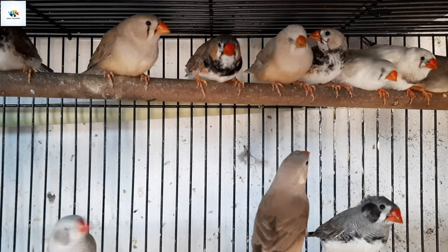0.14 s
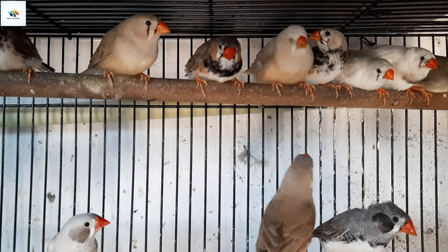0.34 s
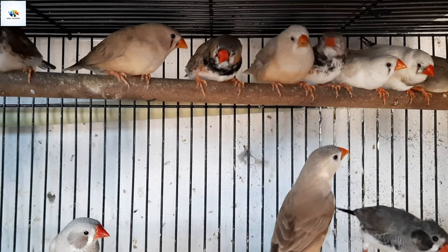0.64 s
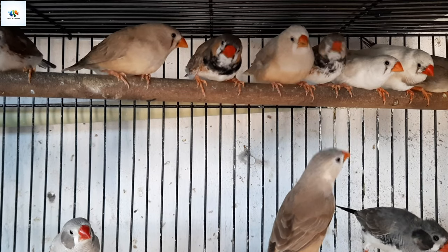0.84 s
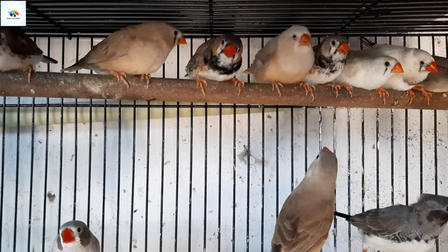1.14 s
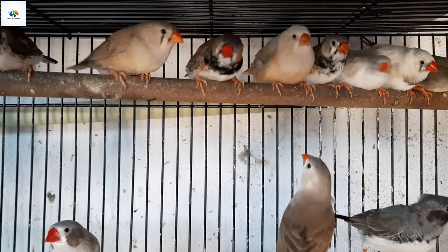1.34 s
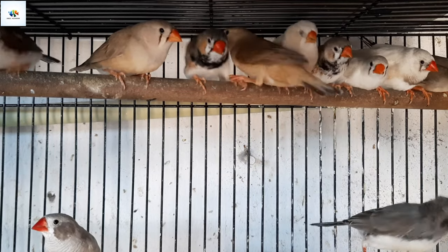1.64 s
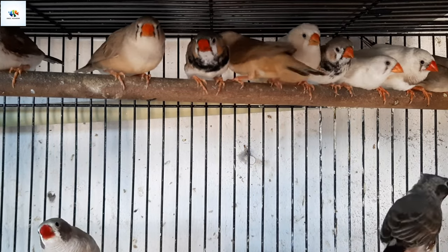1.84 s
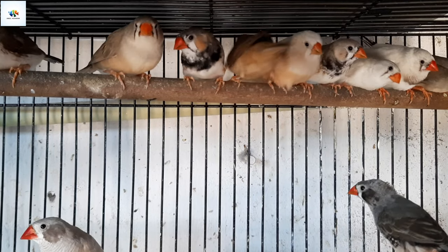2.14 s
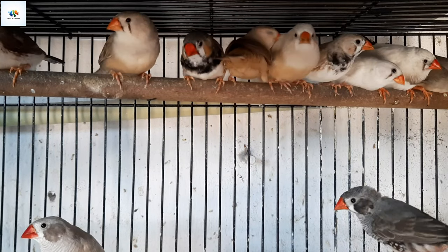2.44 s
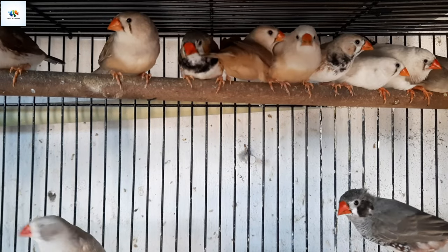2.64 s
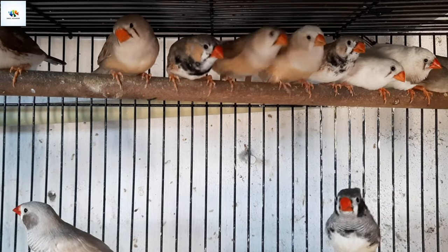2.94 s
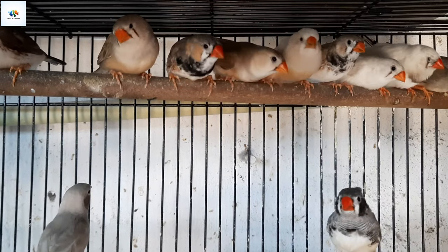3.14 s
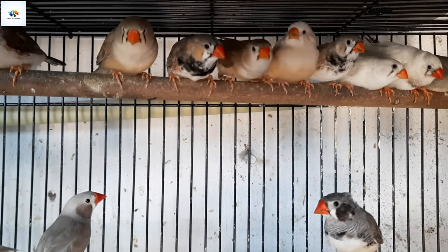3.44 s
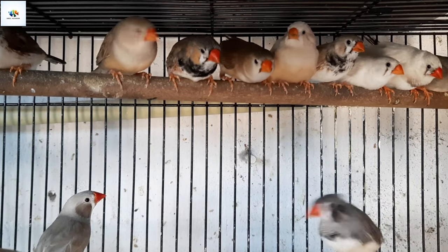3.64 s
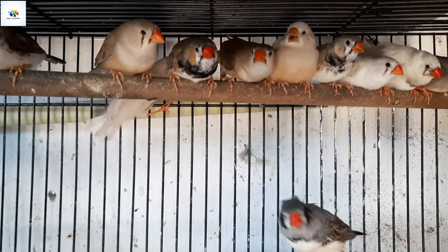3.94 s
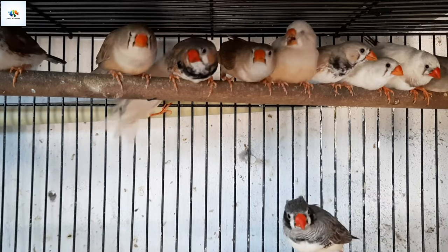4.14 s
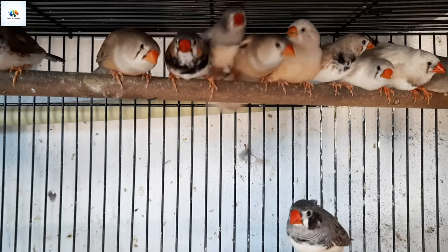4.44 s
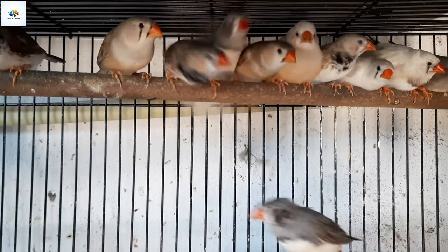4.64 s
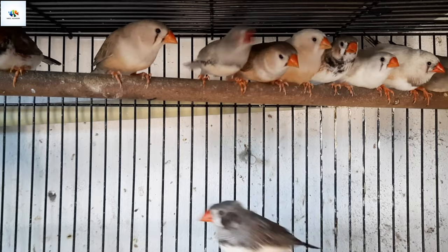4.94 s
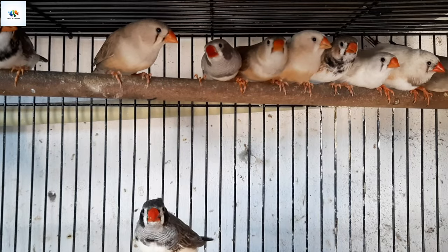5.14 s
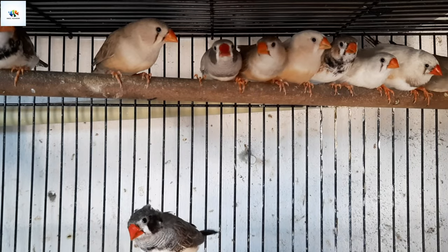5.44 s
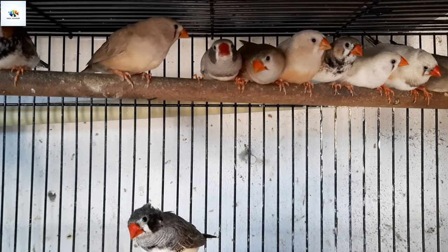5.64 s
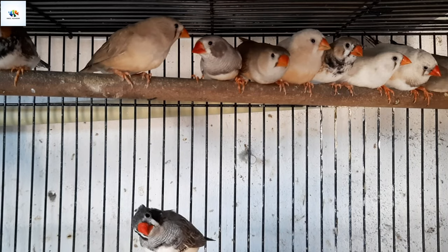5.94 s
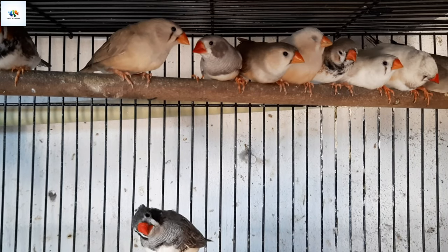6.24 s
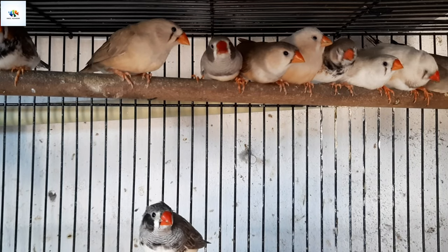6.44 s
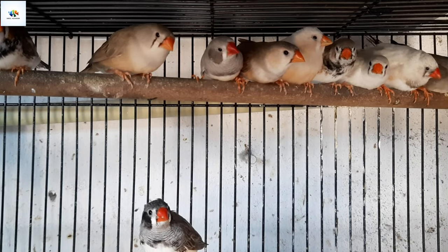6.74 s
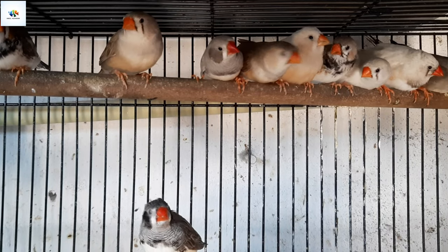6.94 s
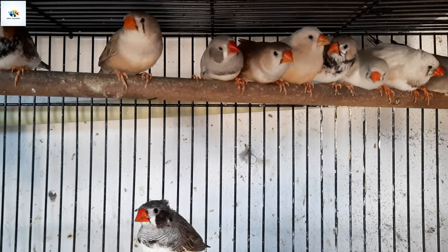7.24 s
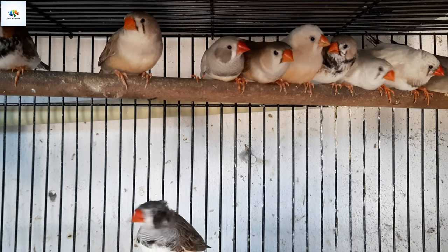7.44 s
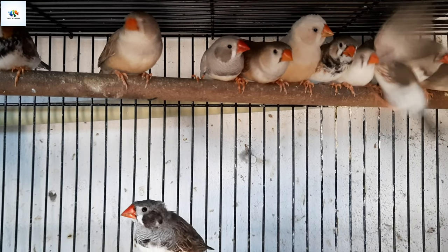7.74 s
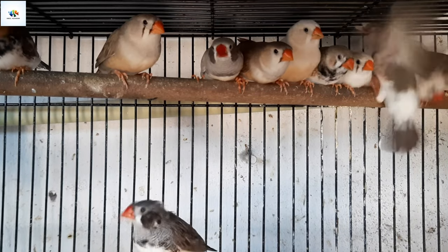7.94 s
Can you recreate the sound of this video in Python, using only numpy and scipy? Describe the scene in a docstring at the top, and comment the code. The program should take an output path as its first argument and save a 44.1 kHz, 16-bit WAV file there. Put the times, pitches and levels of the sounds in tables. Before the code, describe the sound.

Caged finches chatter indoors with raspy, hoarse calls, short peeps and bending whistles, over faint hiss and low room rumble, heard mostly on the right.

```python
"""Room rumble, hiss and soft flock chatter open the scene; clipped notes, peeps and hoarse calls soon join.
Zebra finches crowd a perch in an indoor cage: whistles bend, flutter and roughen, and hoarse calls are
pulses and air through a throat resonance. Taps on the wire, wing beats and low puffs are shaped noise.
The hiss dies away late on. Nearly all is on the right; the left has rumble and a dull trace of the birds.
"""
import sys
import numpy as np
from scipy import signal
from scipy.fft import rfft, irfft, next_fast_len
from scipy.io import wavfile
from scipy.ndimage import uniform_filter1d

SR = 44100
rng = np.random.default_rng(int(sys.argv[2]) if len(sys.argv) > 2 else 0)


def wrap_up_sound(samples):
    """Save the sound to the file named by the first command line argument, as 16-bit audio."""
    columns = np.atleast_2d(samples).T
    # keep every value between -1 and 1, then stretch to whole-number steps
    tamed = np.clip(columns, -1, 1)
    steps = np.round(tamed * 32767).astype(np.int16)
    wavfile.write(sys.argv[1], SR, steps)


N = 356769

# All levels below are ahead of the mix gains in scene().
# Colour of the room's rumble: frequency_hz, gain_db
ROOM_COLOUR = [(20, -12.5), (45, -1.5), (115, 1), (200, -2), (330, -10.5), (490, -5), (700, -12),
               (4000, -17.5), (6500, -20), (9000, -38.5)]
# Level of the room's rumble: start_s, level_db
ROOM_LEVEL = [(0, -52), (.75, -58), (2.3, -47), (3.3, -47), (4.4, -51), (6.3, -55.5), (8.09, -52)]
# Colour of the hiss: frequency_hz, gain_db
HISS_COLOUR = [(300, -82), (1000, -20.5), (2200, -10), (4000, -4), (5300, 2.5), (6600, 3.5), (7900, -8),
               (10000, -11), (13000, -20.5)]
# Level of the flock's chatter: start_s, level_db
CHATTER_LEVEL = [(0, -63.5), (.3, -43), (.55, -59.5), (.97, -44.5), (1.22, -50.5), (1.6, -45), (3.7, -47),
                 (4.2, -50.5), (5.7, -52), (6, -60.5), (7.15, -57), (7.35, -62.5), (8.09, -53)]
# Tiny clipped contact notes: start_s, length_s, level_db
TET_NOTES = [(0.059, 0.016, -41.5), (0.163, .02, -37.5), (1.259, .018, -41.5), (2.704, 0.026, -36.5),
             (2.796, 0.048, -35), (2.877, 0.043, -34.5), (7.462, 0.014, -50.5), (7.545, .019, -53),
             (7.601, 0.014, -47), (7.674, 0.025, -46.5), (7.755, 0.017, -46)]
# Short rising peeps: start_s, length_s, level_db, pitch_hz
RISING_PEEPS = [(0.229, 0.053, -41.5, 2990), (0.334, 0.05, -37, 3010), (0.849, .04, -48.5, 998),
                (1, 0.054, -45.5, 2660), (1.177, 0.02, -42, 1920), (2.577, .03, -39.5, 2890),
                (2.623, 0.061, -38.5, 1680), (2.969, 0.043, -44, 2620), (3.059, 0.046, -42.5, 2664),
                (3.533, 0.04, -35.5, 2870), (4.207, 0.027, -40, 2480), (4.264, 0.038, -45.5, 2820),
                (4.316, 0.038, -44, 2600), (4.807, 0.023, -41, 2580), (6.617, 0.036, -49, 1246),
                (6.659, 0.059, -47, 1870), (7.196, .035, -49, 1750)]
# Hoarse calls: start_s, length_s, level_db, throat_hz
HOARSE_CALLS = [(0.245, 0.028, -28.5, 4460), (0.353, 0.049, -32, 4900), (0.574, 0.077, -26, 6400),
                (0.694, 0.083, -28, 4500), (0.754, 0.063, -30.5, 5900), (1.297, 0.025, -30.5, 3900),
                (1.577, 0.07, -31.5, 6030), (1.65, 0.19, -28.5, 6460), (1.783, 0.094, -24, 5540),
                (1.89, 0.1, -21.5, 6150), (1.957, 0.11, -26.5, 5270), (2.044, .11, -20, 6080),
                (2.147, 0.063, -33.5, 4870), (2.226, 0.13, -23.5, 6480), (2.451, 0.13, -21.5, 6260),
                (2.904, 0.096, -25, 6030), (3.051, 0.071, -27.5, 5940), (3.113, 0.13, -23.5, 6240),
                (3.238, 0.088, -24, 6600), (3.322, 0.088, -23, 5630), (3.384, 0.091, -22, 6160),
                (3.466, 0.066, -27.5, 6460), (3.66, 0.056, -30, 3600), (4.358, 0.054, -31, 6350),
                (4.527, 0.11, -30.5, 5460), (4.661, 0.038, -35.5, 4170), (4.867, 0.07, -30.5, 6140),
                (5.027, .12, -33.5, 5840), (5.142, 0.059, -33.5, 6400), (5.259, 0.053, -34.5, 5350),
                (5.622, 0.019, -32.5, 4400), (6.66, 0.034, -39, 3440), (6.734, 0.039, -41, 4040),
                (6.851, 0.028, -31, 5530)]
# Colour of a hoarse call beside its throat resonance: frequency_hz, gain_db
VOICE_COLOUR = [(700, -37), (1500, -17.5), (2200, -10.5), (3000, -2.5), (4200, 0), (7100, -0.5),
                (8200, -21.5), (9500, -17), (13000, -28.5)]
# Falling chirps: start_s, length_s, level_db, start_pitch_hz, end_pitch_hz
FALLING_CHIRPS = [(0.273, 0.053, -40.5, 3900, 2030), (0.573, 0.14, -47, 2620, 1544),
                  (1.476, .065, -47, 2140, 1590), (3.699, .08, -44, 2095, 1570),
                  (4.065, 0.064, -50.5, 1925, 1590), (4.419, 0.038, -55, 1960, 1100),
                  (4.768, 0.054, -46.5, 2840, 1920), (4.986, 0.18, -51, 1143, 964),
                  (5.87, 0.14, -55.5, 2090, 1720), (7.034, 0.046, -53.5, 2870, 1410),
                  (7.107, .055, -48, 2030, 1576), (7.254, 0.045, -52, 2100, 1830),
                  (7.525, 0.088, -57, 4200, 4130), (7.697, 0.066, -42.5, 1763, 1590),
                  (7.75, 0.082, -45.5, 2520, 1550), (7.984, 0.08, -51, 1780, 1583)]
# Long warbling calls, one list of turning points each: time_s, pitch_hz, level_db, roughness (held to 0-1)
WARBLE_CALLS = [
    [(0.466, 4600, -35.5, 0.35), (0.495, 3770, -45, 0.4), (0.513, 2770, -35.5, 0.3),
     (0.526, 3900, -36.5, 0.4), (0.55, 4150, -39.5, 0.65), (0.576, 2940, -32.5, 0.55)],
    [(2.155, 3920, -31, 0.42), (2.188, 3460, -29, 0.12), (2.208, 2526, -41, 0.17), (2.216, 3780, -31, 0.6),
     (2.23, 3280, -31, 0.17), (2.256, 2960, -35, 0.1)],
    [(2.332, 4200, -29, 0.2), (2.358, 2750, -44, 0), (2.378, 2290, -42, 0.15), (2.399, 4240, -36.5, 0.42),
     (2.425, 2490, -39, 0.5)],
    [(3.602, 3460, -37, 0.3), (3.612, 3785, -32.5, 0.17), (3.64, 3450, -29, 0.27), (3.66, 2710, -35, 0.6)],
    [(3.732, 2406, -36, 0.34), (3.758, 2838, -31, 0.42), (3.785, 3300, -42, 0.6),
     (3.792, 3234, -25.5, 0.32), (3.83, 3595, -34.5, 0.88), (3.868, 3220, -42.5, 1.2)],
    [(3.906, 4510, -37, 0.15), (3.914, 4550, -36, 0), (3.926, 3480, -46, 0.94), (3.968, 3290, -39.5, 0.92),
     (3.984, 2627, -30.5, 0.44), (4.015, 2930, -37, 0.55)],
    [(5.392, 5670, -53.5, 0.54), (5.425, 3400, -42.5, 0.48), (5.46, 2480, -38.5, 0.35),
     (5.49, 2810, -37, 0.14), (5.512, 2670, -51, 0.6)],
    [(5.605, 4900, -55, 0.8), (5.629, 3900, -45, 0.38), (5.634, 3946, -34.5, 0.64),
     (5.652, 3640, -31.5, 0.42), (5.668, 2885, -40.5, 0.7), (5.698, 3423, -28, 0.26),
     (5.716, 3290, -36, 0.64), (5.727, 2145, -34.5, 0.44), (5.755, 2480, -38.5, 0.34),
     (5.79, 2480, -42, 0.67)],
    [(5.8, 2780, -32.5, 0.5), (5.825, 3200, -31.5, 0.26), (5.838, 4160, -37.5, 1.2),
     (5.848, 5010, -32, 0.2), (5.858, 4800, -70, 0.4)],
    [(6.087, 4520, -45, 0.27), (6.101, 4250, -31, 0.2), (6.113, 4280, -46, 0.6), (6.123, 3264, -41, 0.54),
     (6.146, 2193, -41, 0.5), (6.167, 3294, -34, 0.45), (6.181, 2504, -36, 0.82), (6.208, 3065, -35.5, 0)],
    [(6.502, 5860, -49, 0.2), (6.511, 4800, -40.5, 0.24), (6.538, 3355, -36, 0.74), (6.561, 3680, -42, 0.7),
     (6.567, 3660, -33, 0.48), (6.588, 3350, -31, 0.13), (6.596, 2800, -33.5, 0.1),
     (6.612, 3100, -30.5, 0.3), (6.633, 2820, -39.5, 0.44)],
]
# Beak colour on every whistle: frequency_hz, gain_db
BEAK_COLOUR = [(500, -8), (2500, -1), (5500, 5.5), (11000, -0.5)]
# Claws and beaks on the cage: start_s, level_db
CAGE_TAPS = [(1.0913, -29.5), (2.7718, -28), (5.553, -38.5), (7.404, -39.5), (7.961, -42)]
# Colour of the struck wire: frequency_hz, gain_db
WIRE_COLOUR = [(400, -23), (2800, 7.5), (5500, 8), (8000, -1.5), (15000, -29)]
# Puffs of air from birds flying past: start_s, length_s, level_db
AIR_PUFFS = [(1.27, 0.23, -48.5), (2.881, 0.19, -50.5), (4.531, 0.072, -41)]
# Swells of a hollow low hum in the room: start_s, length_s, level_db
HUM_SWELLS = [(4.03, 0.53, -56), (4.85, 0.32, -55), (5.5, 0.4, -58), (6.17, 0.3, -53), (6.78, 0.39, -59.5)]
# Flurries of wing strokes: start_s, length_s, stroke_interval_s, first_stroke_level_db
WING_FLURRIES = [(6.346, .15, 0.09, -50.5), (6.932, .25, 0.1, -51), (7.741, .24, .064, -47)]
# Colour of brushing feathers: frequency_hz, gain_db
FEATHER_COLOUR = [(300, -36), (900, 9.5), (1800, 9), (3000, 4), (5500, 1.5), (8000, -11.5), (15000, -39)]
# Colour of everything on the left: frequency_hz, gain_db
LEFT_COLOUR = [(30, -18), (70, 3), (250, -14), (500, -16), (2000, -35.5), (4000, -37), (8000, -49)]

RUMBLE_TRIM_DB, FLOCK_TRIM_DB, WARBLE_TRIM_DB, TAP_TRIM_DB = -1.5, -1, -1, -12.5
HISS_DB, HISS_SAG_DB_PER_S, HISS_REST_DB = -39.5, 0.56, -75
HISS_END_S, HISS_FADE_DB_PER_S = 5.245, 104  # the fade adds to the sag
TET_HZ, TET_RISE, TET_OCTAVE_DB = 2662, 0.085, -2.5  # rise: share of pitch gained in each half
PEEP_RISE, PEEP_ROUGH = 0.0725, 0.35  # share of pitch gained in each half; roughness 0-1
# The lower the throat is tuned, the more its resonance stands out.
OPEN_HZ, OPEN_FOCUS, FOCUS_PER_OCTAVE = 6470, 0.48, 0.08
EARLY_DROP, FALL_ROUGH = 0.75, 0.31  # share of the fall over by mid-chirp; roughness 0-1
STROKE_SHARE, FLURRY_FADE_DB_PER_S = 0.65, 15  # stroke length as a share of the interval
ROOM_T60_S = 0.11
EDGE_HZ = 15800  # top of the recorded band


def amp(db):
    """Decibels to gain."""
    return 10 ** (np.asarray(db) / 20)


def unit(x):
    """Scales to rms 1."""
    return x / np.sqrt(np.mean(x ** 2) + 1e-20)


def read(points, hz):
    """Reads a table on a log-frequency axis."""
    f, value = np.transpose(points)
    return np.interp(np.log(hz + 1), np.log(f), value)


def level(points):
    """Turns a dB curve into a gain for every sample."""
    return amp(np.interp(np.arange(N) / SR, *np.transpose(points)))


def colour(x, points):
    """Filters a sound by a spectrum table."""
    size = next_fast_len(len(x))
    gain = amp(read(points, np.fft.rfftfreq(size, 1 / SR)))
    return irfft(rfft(x, size) * gain, size)[:len(x)]


def wander(count, hz):
    """Smooth random drift with little motion faster than hz."""
    size = next_fast_len(count + 2 ** 11)
    f = np.fft.rfftfreq(size, 1 / SR)
    slow = rfft(rng.standard_normal(size)) / (1 + (f / hz) ** 6)
    return unit(irfft(slow, size))[:count]


def noise(count):
    """White noise for one short event."""
    return rng.standard_normal(2 ** 14)[:count]


def swell(t, rise, fall):
    """Rounded rise and fall, in seconds, over the times t."""
    opening = np.sin(np.pi / 2 * np.clip(t / rise, 0, 1))
    closing = np.sin(np.pi / 2 * np.clip((t[-1] - t) / fall, 0, 1))
    return opening * closing


def resonate(x, hz, width_hz):
    """A resonance that follows the curve hz: shift down to zero, smooth twice, shift back."""
    turn = np.exp(2j * np.pi * np.cumsum(hz) / SR)
    r = np.exp(-np.pi * width_hz / SR)
    smooth = signal.lfilter([1], [1, -2 * r, r * r], x / turn)
    return unit((turn * smooth).real)


def add(mix, s, sound):
    """Mixes a sound in at time s."""
    part = mix[max(round(s * SR), 0):][:len(sound)]
    part += sound[:len(part)]


def play(source, table):
    """Plays one sound for each row, at the row's time."""
    mix = np.zeros(N)
    for s, *row in table:
        add(mix, s, source(*row))
    return mix


def mottle(x, depth_db, size):
    """Patches of the spectrum swell and fade by chance; a larger size makes them narrower and slower."""
    z = signal.stft(x, nperseg=size)[2]
    patches = rng.standard_normal(z.shape)
    for axis in (0, 0, 1, 1):
        patches = uniform_filter1d(patches, size=3, axis=axis)
    gain = amp(depth_db * np.tanh(unit(patches) / 2) * 2)
    y = signal.istft(z * gain)[1][:len(x)]
    return unit(y) * np.std(x)


def steady(spectrum, curve):
    """Rumble or hiss: noise of one colour that follows a level curve."""
    return unit(colour(rng.standard_normal(N), spectrum)) * level(curve)


def hiss_level():
    """The hiss holds, sagging slowly, then dies away to a trace: rows of start_s, level_db."""
    t = np.linspace(0, N / SR, 400)
    db = HISS_DB - HISS_SAG_DB_PER_S * t - HISS_FADE_DB_PER_S * np.maximum(t - HISS_END_S, 0)
    return np.column_stack([t, np.maximum(db, HISS_REST_DB)])


def syrinx(hz, rough, second_db=-22, flutter_hz=270, waver=0.414, flutter=0.43, swing=0.0615,
           tremble_db=2.6, half_db=-20, rasp_db=-6, twin_db=-5, blur=1.0):
    """A whistle on the curve hz; roughness first chops it with uneven flutter, then breaks it into a rasp."""
    count, rough = len(hz), np.clip(rough, 0, 1)
    beat = np.sin(2 * np.pi * np.cumsum(flutter_hz * (1 + waver * wander(count, flutter_hz))) / SR)
    shaken_hz = hz * (1 + swing * rough * (beat + wander(count, flutter_hz)))
    phase = 2 * np.pi * np.cumsum(shaken_hz) / SR
    # the octave is less steady
    tone = np.sin(phase) + amp(second_db) * np.sin(2 * phase + blur * wander(count, flutter_hz))
    # strong and weak cycles alternate
    tone += amp(half_db) * 2 * rough * (np.sin(phase / 2) + np.sin(phase + phase / 2))
    # the other side of the syrinx comes and goes
    twin = np.sin(phase * (1 + rng.choice([-1, 1]) * .18)) * wander(count, 52)
    tone += amp(twin_db) * 2 * rough * twin
    hoarse = resonate(noise(count), hz, width_hz=1800)
    chop = 1 + flutter * np.minimum(2 * rough, 1) * (1 - rough ** 2 / 2) * beat
    tremble = amp(2 * tremble_db * rough * np.tanh(wander(count, 80)))
    voice = np.sqrt(1 - rough ** 2) * unit(tone) + 2 * amp(rasp_db) * rough ** 2 * hoarse
    return unit(voice * (chop * tremble))


def chirp(length, db, start_hz, middle_hz, end_hz, rough):
    """A short whistle that bends through three pitches."""
    t = np.arange(0, length, 1 / SR)
    u = t / t[-1]
    hz = start_hz * (1 - u) * (1 - 2 * u) + middle_hz * 2 * u * 2 * (1 - u) + end_hz * u * (2 * u - 1)
    return amp(db) * unit(syrinx(hz, rough)) * swell(t, rise=0.0083, fall=0.015)


def chatter(count=1150, rough=0.33):
    """Soft brief rough peeps from the rest of the flock, sliding up or down."""
    mix = np.zeros(N)
    for k, (when, pitch, slide, bend, span, size) in enumerate(rng.random((count, 6))):
        hz = 850 * np.exp(.66 * (pitch + bend))
        glide = np.exp(0.354 * slide - .17)
        call = chirp(.01 + .018 * span, -8 * size, hz * glide, hz, hz / glide, rough)
        add(mix, (k + when) / count * N / SR, call)
    return amp(FLOCK_TRIM_DB) * unit(colour(mix, BEAK_COLOUR)) * level(CHATTER_LEVEL)


def cage(x, spread=.008, echo_db=-7, count=14, size=4096):
    """Cage and nearby walls scatter calls within milliseconds, changing as the birds move."""
    out, window = x.copy(), signal.get_window("hann", size)
    for start in range(0, N, size // 2):
        when, strength = rng.random(count), rng.standard_normal(count)
        echoes = np.zeros(2 ** 11)
        echoes[(np.clip(when * spread, 0, .04) * SR).astype(int)] = strength * np.exp(-when)
        echoes /= np.linalg.norm(echoes)
        piece = x[start:start + size]
        scattered = signal.fftconvolve(piece * window[:len(piece)], echoes)
        add(out, start / SR, amp(echo_db) * scattered)
    return out


def room(x, density=3000):
    """Sparse reflections, density per second, that die quickly."""
    t = np.arange(SR // 2) / SR
    tail = rng.standard_normal(len(t)) * (rng.random(len(t)) < density / SR)
    tail *= np.exp(-np.log(1000) * t / ROOM_T60_S)
    tail[:SR // 300] = 0  # a gap before the first reflection
    return signal.fftconvolve(x, tail / np.linalg.norm(tail))[:N]


def tet(length, db):
    """A clipped upward note with a strong octave."""
    t = np.arange(0, length, 1 / SR)
    hz = TET_HZ * (1 + TET_RISE * np.linspace(-1, 1, len(t)))
    note = syrinx(hz, PEEP_ROUGH, second_db=TET_OCTAVE_DB)
    return amp(db) * note * swell(t, length / 2, length / 2)


def peep(length, db, hz):
    """A short note that slides up through its pitch."""
    return chirp(length, db, hz * (1 - PEEP_RISE), hz, hz * (1 + PEEP_RISE), PEEP_ROUGH)


def rasp(length, db, throat_hz, pulse_hz=700, jitter=0.05115, air=0.73, buzz_db=1.2, burst_hz=200,
         burst=0.3, ring=.3):
    """Smeared, uneven syrinx pulses and rushing air come in quick bursts and ring the wavering throat."""
    t = np.arange(0, length + 0.0058, 1 / SR)
    call_pulse_hz = pulse_hz * rng.uniform(.8, 1.3)
    turns = np.cumsum(call_pulse_hz * (1 + jitter * wander(len(t), 168.3))) / SR
    # phases that grow with k * k smear each pulse
    pulses = sum(np.cos(2 * np.pi * k * turns + k * k / 2) for k in range(1, 20))
    drive = unit(pulses) + air * noise(len(t))
    focus = np.clip(OPEN_FOCUS + FOCUS_PER_OCTAVE * np.log2(OPEN_HZ / throat_hz), 0, 1)
    hz = throat_hz * (1 + 0.042 * wander(len(t), 24))
    throat = unit(resonate(drive, hz, width_hz=2070) + ring * resonate(drive, hz, width_hz=270))
    voice = np.sqrt(1 - focus) * unit(colour(drive, VOICE_COLOUR)) + np.sqrt(focus) * throat
    uneven_hz = burst_hz * amp(2 * wander(len(t), burst_hz))
    bursts = 1 + burst * np.sin(2 * np.pi * np.cumsum(uneven_hz) / SR)
    buzz = amp(buzz_db * wander(len(t), burst_hz))
    return amp(db) * unit(voice * bursts * buzz) * swell(t, rise=0.031, fall=0.033)


def falling_chirp(length, db, start_hz, end_hz):
    """The pitch drops fast, then levels out."""
    middle_hz = start_hz + EARLY_DROP * (end_hz - start_hz)
    return chirp(length, db, start_hz, middle_hz, end_hz, FALL_ROUGH)


def warbles(edge=.004):
    """Each long call is one unbroken whistle that zigzags in pitch and passes in and out of roughness."""
    mix = np.zeros(N)
    for points in WARBLE_CALLS:
        s, *controls = np.transpose(points)
        t = np.arange(s[0] - edge / 2, s[-1] + edge, 1 / SR)
        hz, db, rough = (np.interp(t, s, control) for control in controls)
        call = amp(db + WARBLE_TRIM_DB) * syrinx(hz, rough)
        add(mix, t[0], call * swell(t - t[0], edge, edge))
    return mix


def tap(db, crack_db=6, crack_t60=0.01, t60=0.28):
    """A sharp tick with a short rattle of wire: noise with a fast and a slow decay."""
    t = np.arange(2 ** 13) / SR
    crack = amp(crack_db) * np.exp(-np.log(1000) * t / crack_t60)
    rattle = amp(-0.5) * np.exp(-np.log(1000) * t / t60)
    return amp(db) * unit(colour(noise(len(t)), WIRE_COLOUR)) * (crack + rattle)


def throb(table, hz, width_hz):
    """Puffs or hum: swells of air stirring one low resonance."""
    def one(length, db):
        """One swell of resonant noise."""
        t = np.arange(0, length, 1 / SR)
        air = rng.standard_normal(SR)[:len(t)]
        return amp(db) * resonate(air, np.full(len(t), hz), width_hz) * swell(t, rise=0.021, fall=0.1)
    return play(one, table)


def strokes():
    """Each flurry is an even beat of weakening strokes: rows of start_s, length_s, level_db."""
    rows = []
    for s, length, beat, db in WING_FLURRIES:
        for t in np.arange(0, length, beat):
            rows.append((s + t, STROKE_SHARE * beat, db - FLURRY_FADE_DB_PER_S * t))
    return rows


def wing(length, db):
    """Feathers brush each other in a grainy swish."""
    t = np.arange(0, length, 1 / SR)
    grain = amp(2 * wander(len(t), 340))
    brush = colour(noise(len(t)) * grain, FEATHER_COLOUR)
    return amp(db) * unit(brush) * swell(t, rise=length / 2, fall=length / 2)


def scene():
    """Near birds, the flock behind them and the room, heard almost wholly on the right."""
    rasps = mottle(play(rasp, HOARSE_CALLS), depth_db=3.1, size=256)
    feathers = mottle(play(wing, strokes()), depth_db=9.0, size=256)
    notes = play(falling_chirp, FALLING_CHIRPS) + play(peep, RISING_PEEPS) + play(tet, TET_NOTES)
    whistles = colour(warbles() + notes, BEAK_COLOUR)
    taps = amp(TAP_TRIM_DB) * play(tap, CAGE_TAPS)
    near = amp(1.5) * cage(rasps + whistles + feathers + taps)
    flock = chatter()
    birds = near + amp(-9.0) * room(near) + flock + amp(-7.5) * room(flock)
    low = throb(AIR_PUFFS, hz=101.6, width_hz=56) + throb(HUM_SWELLS, hz=473.0, width_hz=104)
    rumble = amp(RUMBLE_TRIM_DB) * mottle(steady(ROOM_COLOUR, ROOM_LEVEL), depth_db=4.5, size=1024)
    hiss = mottle(steady(HISS_COLOUR, hiss_level()), depth_db=2.0, size=512)
    right = birds + low + rumble + hiss
    left_rumble = 0.41 * steady(ROOM_COLOUR, ROOM_LEVEL)  # independent of the right
    left = colour(0.24 * birds + 0.45 * (low + rumble) + room(birds) + left_rumble, LEFT_COLOUR)
    return amp(5) * np.array([left, right])


def record(dry, ceiling=0.34):
    """The recorder rounds off the highest peaks, then limits the band."""
    rounded = ceiling * np.tanh(dry / ceiling)
    lowpass = signal.firwin(511, EDGE_HZ, window=("kaiser", 9), fs=SR)
    return signal.oaconvolve(rounded, lowpass[None], "same")


dry = scene()
out = record(dry)
wrap_up_sound(out)
```